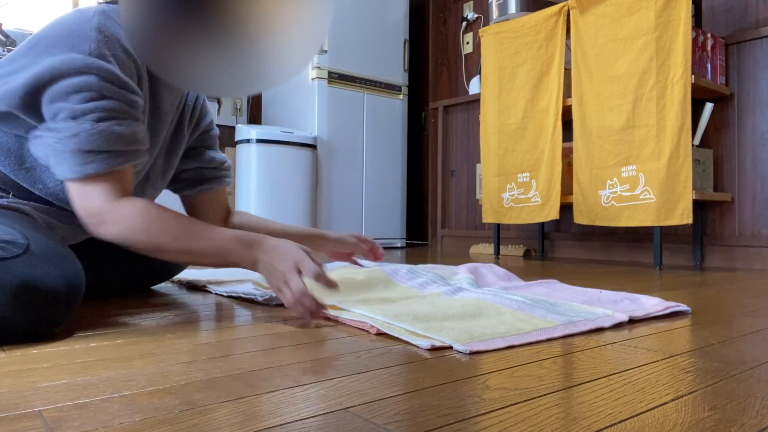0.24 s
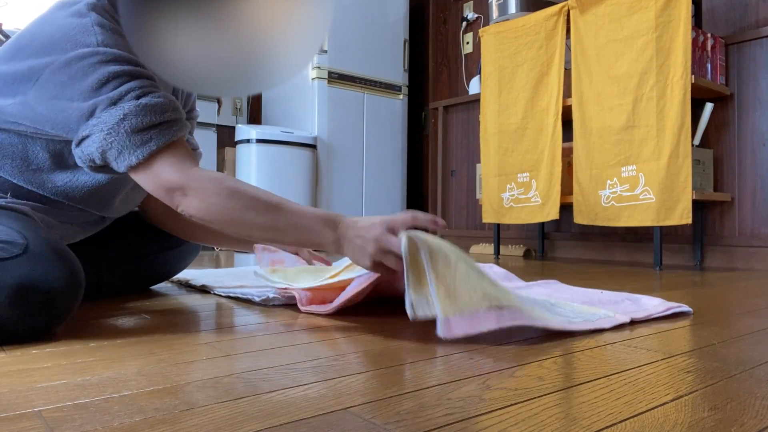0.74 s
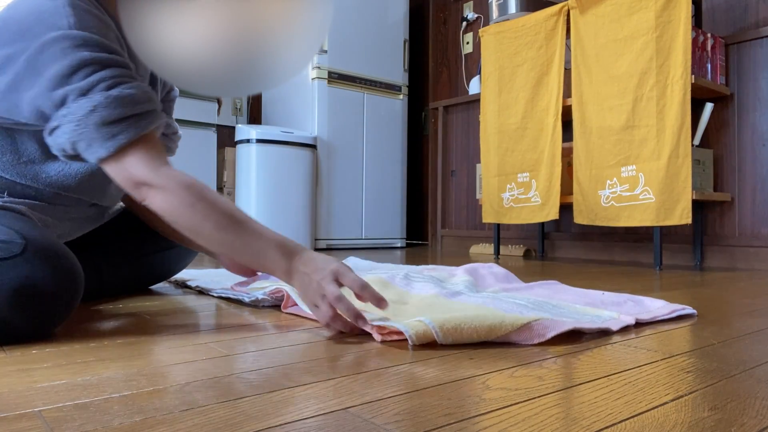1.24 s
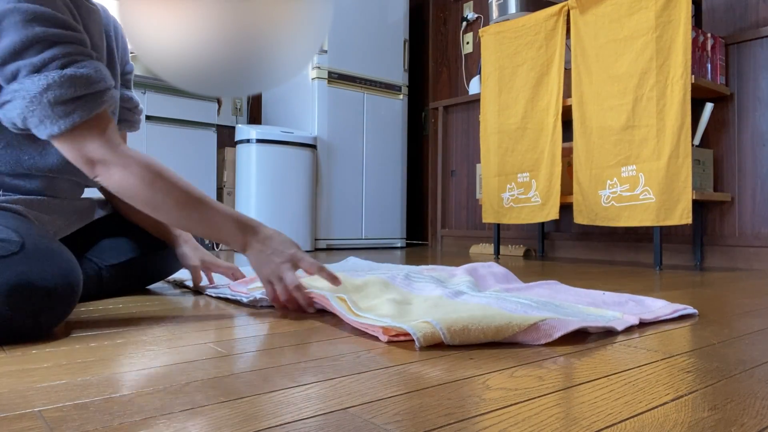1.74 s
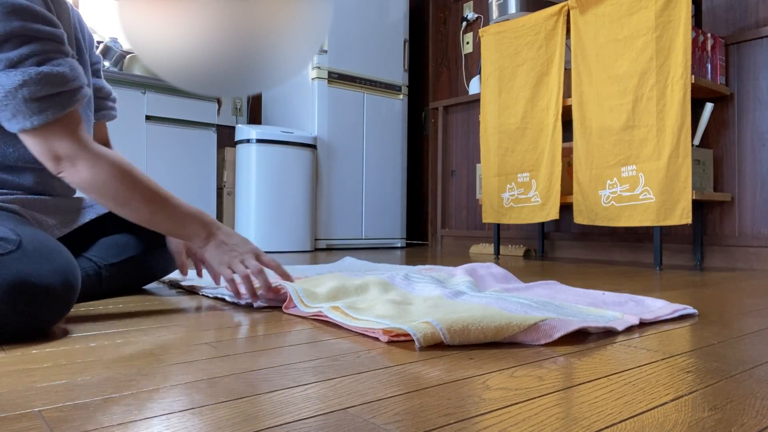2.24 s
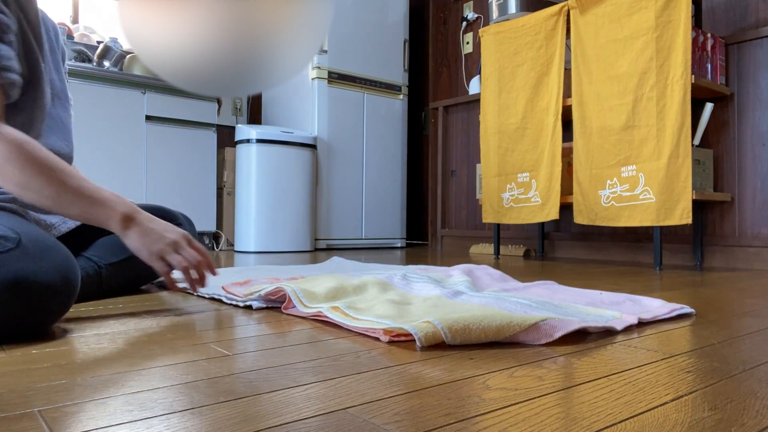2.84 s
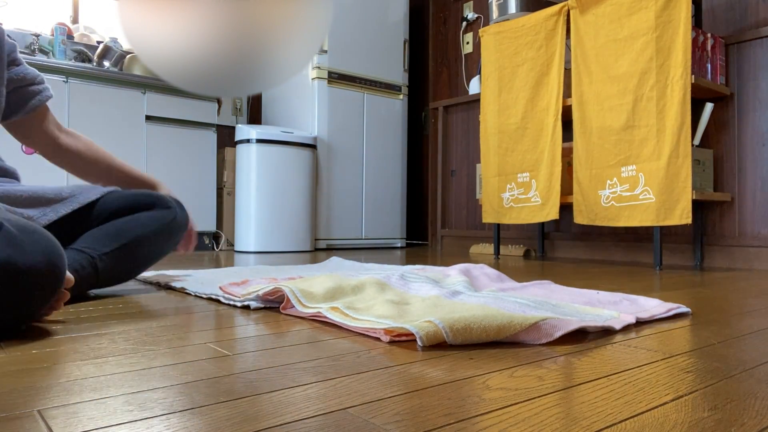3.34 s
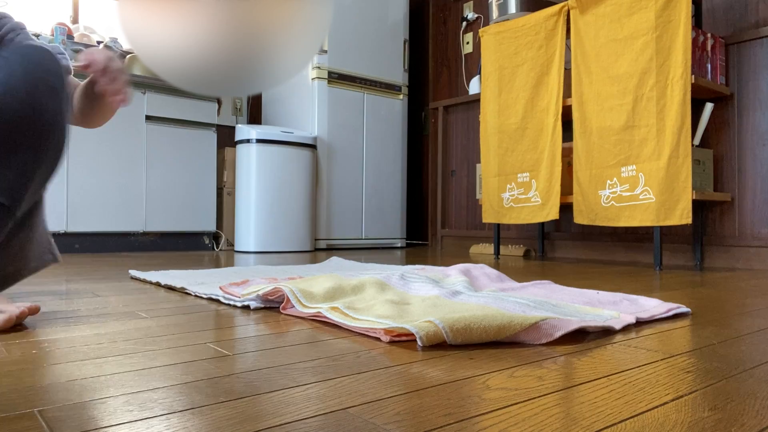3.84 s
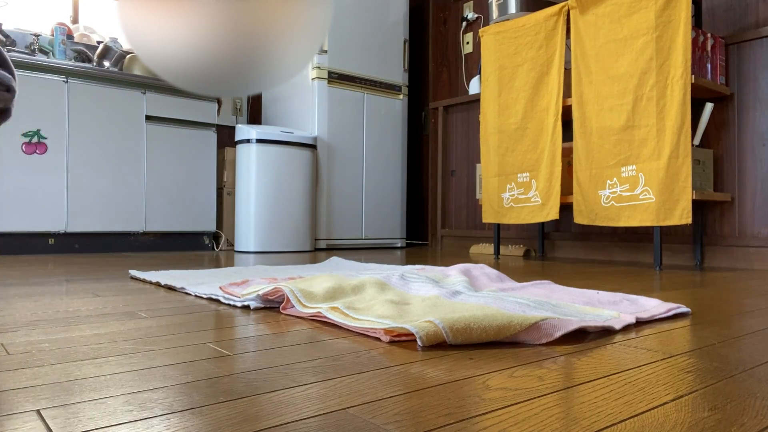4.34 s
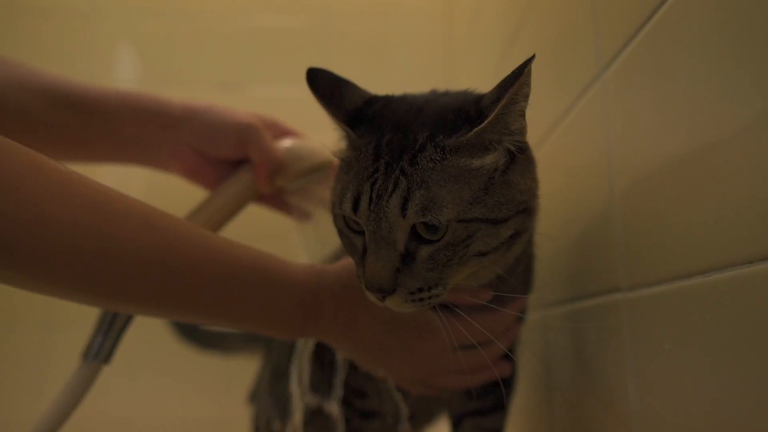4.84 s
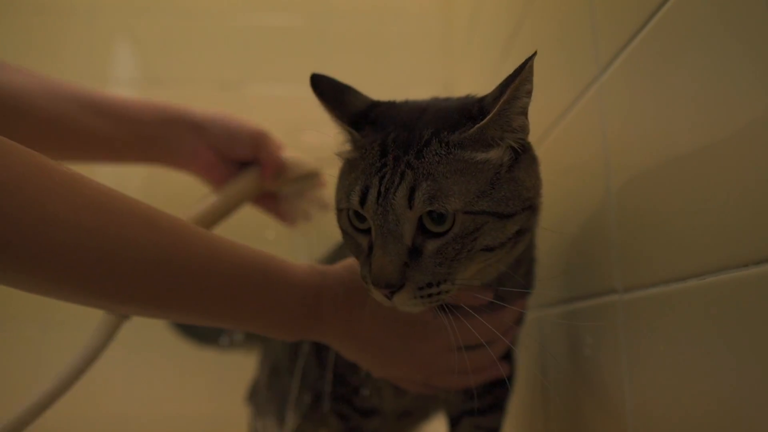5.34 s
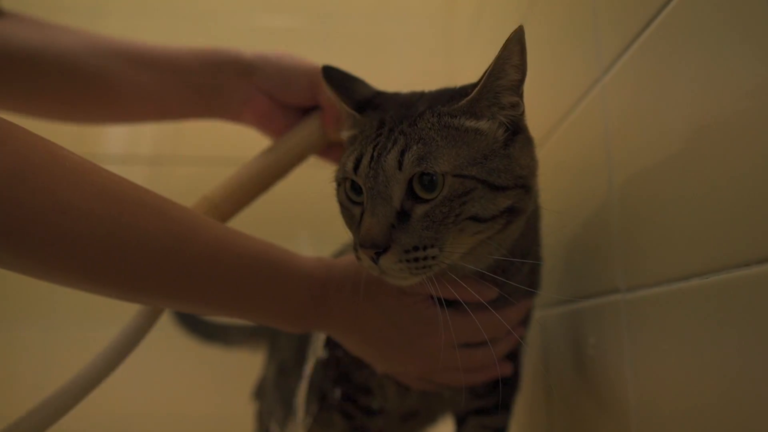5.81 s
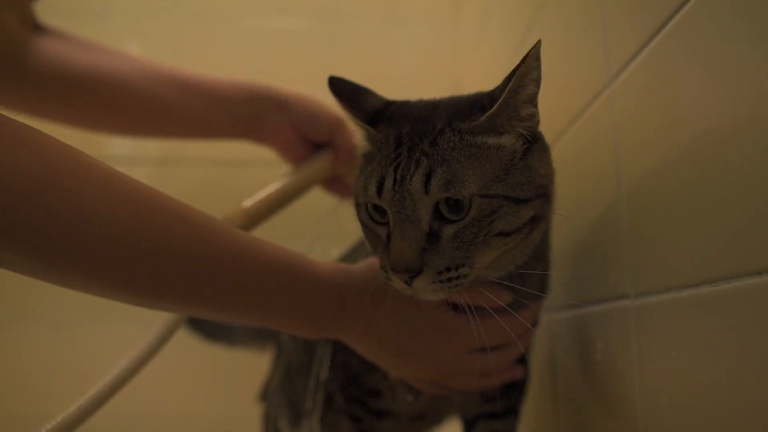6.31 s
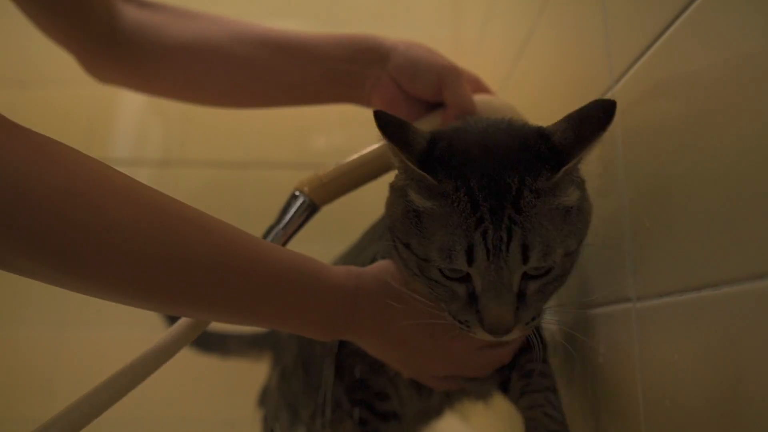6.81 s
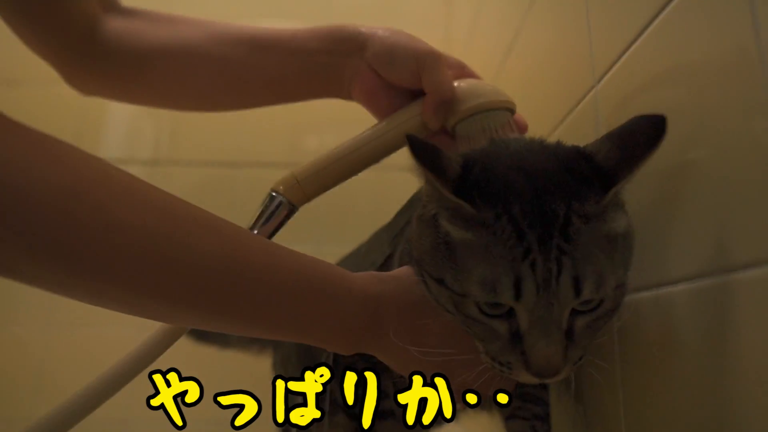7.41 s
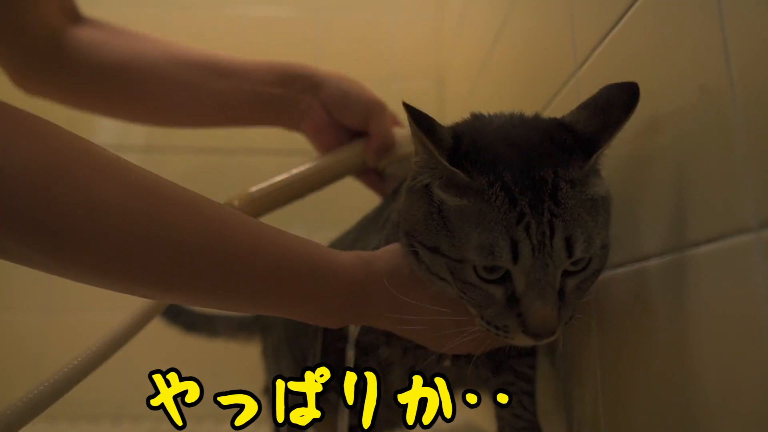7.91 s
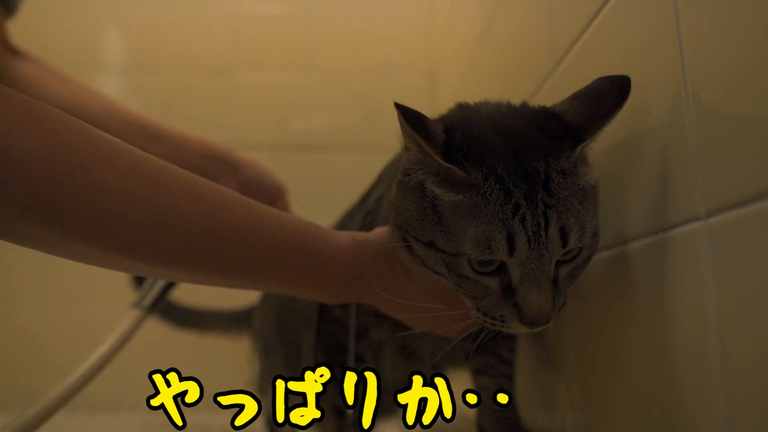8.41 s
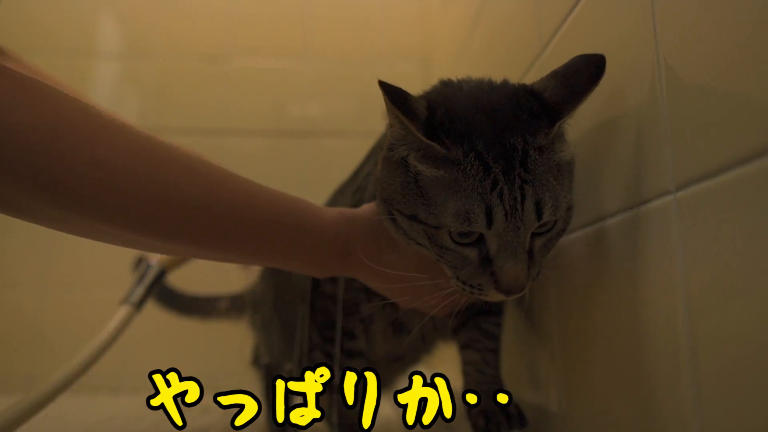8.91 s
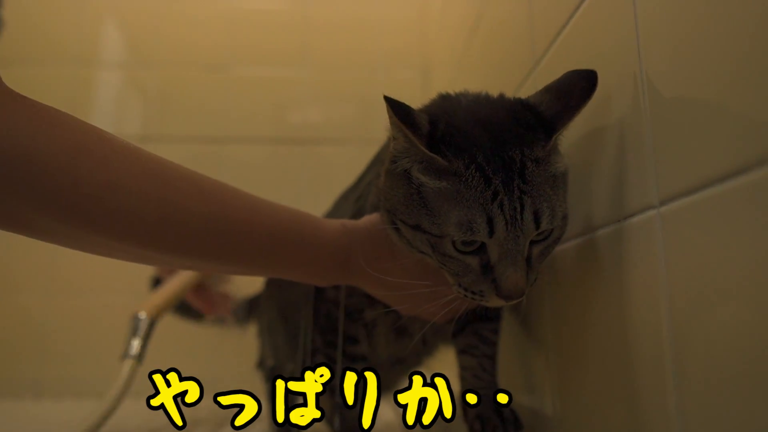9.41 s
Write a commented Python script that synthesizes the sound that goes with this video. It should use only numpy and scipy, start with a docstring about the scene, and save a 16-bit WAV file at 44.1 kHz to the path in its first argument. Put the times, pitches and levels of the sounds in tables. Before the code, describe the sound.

Sparse, low floor thuds, small taps and soft terry-cloth sweeps come first, picked up near the floor in a bare room, a little left of centre. A cluster of heavier thumps follows as someone gets up. Abruptly, continuous water takes over, mono and close: fizzing spray whose pitch shifts as the shower head moves, splattering run-off, sharp drips and ticks on tiles, and a dull tray rumble.

```python
"""A cloth swish and a first thump over a low hum: towels are being spread on a wooden kitchen floor.
Hands and knees set floor modes ringing; shaped noise makes the cloth, a little left of the stereo centre.
Then, all at once, a small tiled bathroom, heard from straight ahead: a hand shower over a cat's wet fur.
Noise and tiny rings make its hiss, which changes pitch as the head moves; run-off patters, plops and
drums on the hollow shower tray."""
import sys
import numpy as np
from scipy import signal
from scipy.fft import rfft, irfft, next_fast_len
from scipy.io import wavfile
from scipy.ndimage import map_coordinates

SR = 44100
rng = np.random.default_rng(int(sys.argv[2]) if len(sys.argv) > 2 else 0)


def wav_out(sig):
    """Save sig, one row per channel (or a flat mono array), as 16-bit PCM at SR to the path in sys.argv[1]."""
    wavfile.write(sys.argv[1], SR, np.round(np.clip(np.atleast_2d(sig).T, -1, 1) * 32767).astype(np.int16))


N = 426006
TIME = np.arange(N) / SR


def amp(db):
    """Decibels to linear gain."""
    return np.exp(np.asarray(db) * (np.log(10) / 20))


def unit(x):
    """x at rms 1."""
    return x / np.sqrt(np.mean(x ** 2) + 1e-20)


def crest(x):
    """x at peak 1."""
    return x / np.abs(x).max()


def curves(rows, t=TIME):
    """Each column after the time, read at the times t."""
    s, *cols = np.transpose(rows)
    return [np.interp(t, s, c) for c in cols]


def add(track, s, sound):
    """Mix a sound in at s seconds."""
    start = round(s * SR)
    track[start:start + len(sound)] += sound[:N - start]


def wobble(rate):
    """A smooth random curve, rate knots a second."""
    t = TIME[::64]
    knots = rng.standard_normal(int(N * rate / SR) + 4)
    return np.interp(TIME, t, map_coordinates(knots, [t * rate]))


def held(start, end, edge_s, t=TIME):
    """Rise, hold and fall, from 0 to 1 and back; each edge takes edge_s."""
    return np.clip(np.minimum(t - start, end - t) / edge_s + .5, 0, 1)


def spells(rows, edge_s):
    """The gain of a sound that comes and goes in (start, end, dB) spells."""
    t = TIME[::64]
    gain = sum(amp(db) * held(start, end, edge_s, t) for start, end, db in rows)
    return np.interp(TIME, t, gain)


def filtered(x, response):
    """x times a response of frequency."""
    n = x.shape[-1]
    m = next_fast_len(n + 8192, real=True)
    gain = np.float32(response(np.fft.rfftfreq(m, 1 / SR)))
    return irfft(rfft(np.float32(x), m) * gain, m)[..., :n]


def coloured(x, points):
    """x through a (Hz, dB) spectrum, at rms 1."""
    f, db = np.transpose(points)
    return unit(filtered(x, lambda hz: amp(np.interp(np.log(hz + 1), np.log(f), db))))


def hiss():
    """White noise."""
    return rng.standard_normal(N, dtype=np.float32)


def grains(rate, low_hz, high_hz, cycles, spread_db, size=400):
    """Countless tiny damped rings of random time, pitch and size, rate a second, at rms 1."""
    draws = rng.random((int(rate * N / SR), 4), dtype=np.float32)
    when, pitch, chance, life = draws.T[:, :, None]
    turns = low_hz * (high_hz / low_hz) ** pitch * np.arange(size, dtype=np.float32) / SR
    strength = amp(-spread_db * np.log(np.maximum(chance, .004))).astype(np.float32)
    rings = strength * np.sin(2 * np.pi * turns) * np.exp(-turns / (cycles * (.5 + life)))
    places = (when * N).astype(int) + np.arange(size)
    return unit(np.bincount(places.ravel(), rings.ravel(), minlength=N)[:N])


def tail(t60):
    """The walls' answer to a click: dense, dying, of unit energy."""
    t = np.arange(SR // 3) / SR
    answer = rng.standard_normal(len(t)) * amp(-60 * t / t60) * (1 - np.exp(-t / 0.0006))
    return answer / np.linalg.norm(answer)


def echo(x, t60):
    """The walls' answer to x; it keeps changing as the source moves about."""
    answer, block = np.zeros(N), SR // 5
    for start in range(0, N, block):
        piece, walls = x[start:start + block], tail(t60)
        if piece.any():
            add(answer, start / SR, signal.fftconvolve(np.float32(piece), np.float32(walls)))
    return answer


def ring(modes, cycles, cutoff_hz, scatter_db):
    """One blow on (Hz, dB, t60) modes: each builds up over a few cycles; soft contact spares the high ones."""
    t = np.arange(SR // 3) / SR
    hz, db, t60 = np.transpose(modes)[:, :, None]
    contact = 1 / np.hypot(1, (hz / cutoff_hz) ** 3)
    strength = amp(db + scatter_db * rng.standard_normal(hz.shape) - 60 * t / t60) * contact
    detune = 1 + 0.032 * rng.standard_normal(hz.shape)
    sway = np.sin(2 * np.pi * (hz * t * detune + 0.49 * rng.random(hz.shape)))
    # low modes build up later, so the sound falls in pitch
    build_up = 1 - np.exp(-(t * hz / cycles) ** 2)
    return crest((strength * sway * build_up).sum(0))


def snap(hz, t60, rough, glide):
    """A short ring that glides in pitch, roughened by a burst of noise around it."""
    t = np.arange(SR // 8) / SR
    band = signal.butter(3, [hz * .55, min(hz * 1.6, SR * .45)], "band", fs=SR)
    burst = unit(signal.lfilter(*band, rng.standard_normal(len(t))))
    pitch = hz * (1 + glide * (np.minimum(t / t60, 1) - .2))
    tone = np.sin(2 * np.pi * np.cumsum(pitch) / SR)
    return crest((tone + rough * burst) * amp(-60 * t / t60) * (1 - np.exp(-t * hz)))


def pat(cutoff_hz, t60):
    """Air squeezed out between two flat surfaces: a puff without pitch, duller the softer they are."""
    t = np.arange(SR // 16) / SR
    puff = rng.standard_normal(len(t)) * amp(-60 * t / t60)
    puff[0] += 3  # the first touch
    band = signal.butter(4, [220, cutoff_hz], "band", fs=SR, output="sos")
    return crest(signal.sosfilt(band, puff))


def stroke(loops, s, length, spectrum, tilt_db, sharpness=0.97):
    """One pass of the hand: the cloth sounds as it speeds up and fades as it slows."""
    piece = loops[round(s * SR):round((s + length) * SR)]
    speed = np.abs(np.sin(np.linspace(0, np.pi, len(piece))))
    tilted = [(hz, db + tilt_db * np.log2(hz)) for hz, db in spectrum]
    return speed ** sharpness * coloured(piece, tilted)


def sliding(x, passes, octaves, edge_s, upper_skirt=1.56):
    """In each pass a broad peak (a dip if its height is negative) slides from first pitch to last."""
    hz, t, z = signal.stft(x, SR, nperseg=512)
    for start, end, height_db, first_hz, last_hz in passes:
        swell = held(start, end, edge_s, t)
        on = swell > 0
        centre = np.interp(t[on], [start, end], [first_hz, last_hz])
        above = np.log2((hz[:, None] + 1) / centre)
        width = np.where(above < 0, octaves, upper_skirt * octaves)
        z[:, on] *= amp(height_db * swell[on] * np.exp(-(above / width) ** 2))
    return signal.istft(z, SR, nperseg=512)[1][:N]


def patchy(x, depth_db, per_s, per_octave):
    """The jets keep meeting other tufts and puddles, so each band swells and fades on its own."""
    hz, t, z = signal.stft(x, SR, nperseg=256)
    at = np.meshgrid(np.log2(1 + hz / 500) * per_octave, t * per_s, indexing="ij")
    knots = rng.standard_normal([int(a.max()) + 2 for a in at])
    patches = unit(map_coordinates(knots, at, order=1))
    return unit(signal.istft(z * amp(depth_db * patches), SR, nperseg=256)[1][:N])


def tiled(x, wet_db):
    """Close tiles throw the water's sound back and give it a hollow colour."""
    near = signal.oaconvolve(x, tail(t60=0.026))[:N]
    return x + amp(wet_db) * (0.62 * near + 1.26 * echo(x, t60=0.53))


# Spectrum of the kitchen's low hum: (frequency [Hz], relative level [dB per Hz])
KITCHEN_AIR = [(20, -26), (60, 1), (110, -6.5), (220, -21.5), (400, -28), (800, -37.5), (2000, -44),
               (6000, -50), (15000, -55.5)]


def kitchen_hum():
    """The room behind everything: a hum common to both channels plus one of each channel's own."""
    shared = coloured(hiss(), KITCHEN_AIR)
    return shared + 0.89 * np.array([coloured(hiss(), KITCHEN_AIR) for ear in range(2)])


# Weight shifting on the floor: (start [s], end [s], relative level [dB])
SHUFFLE = [(.6, 1.03, -47.5), (1.8, 2.25, -52.5), (2.97, 3.15, -47.5), (3.15, 3.6, -56.5),
           (3.62, 4.05, -45), (4.1, 4.52, -49)]
# Spectrum of that rumble: (frequency [Hz], relative level [dB per Hz])
SHIFTING = [(20, -27), (42, -7), (63, 8), (100, -1), (170, -6), (300, -23), (500, -32.5), (900, -75)]


def shuffling():
    """Weight shifting over the boards: low noise in spells."""
    return spells(SHUFFLE, edge_s=0.091) * amp(2.5) * coloured(hiss(), SHIFTING)


# Hands, knees and feet on the boards:
# (time [s], relative thump level [dB], relative knock level [dB], contact cut-off [Hz])
BLOWS = [(0.252, -29, -31, 415), (0.578, -16, -27, 287), (0.845, -37, -35, 900), (.874, -19.5, -30.5, 560),
         (1.141, -34, -43.5, 690), (1.307, -43, -35.5, 470), (1.387, -39.5, -39.5, 476),
         (1.558, -36, -32.5, 397), (1.789, -44, -42.5, 500), (1.862, -48, -34.5, 440),
         (2.066, -37, -40, 410), (2.522, -32, -34, 487), (2.569, -36, -38.5, 330), (2.971, -32.5, -41, 170),
         (3.387, -32, -34.5, 258), (3.587, -33.5, -32, 450), (3.623, -26, -34, 253), (3.742, -28, -22, 280),
         (3.778, -23.5, -27, 198), (3.865, -31.5, -46, 180)]
# Modes of the sprung floor as a whole: (nominal frequency [Hz], relative level [dB], t60 [s])
JOISTS = [(60, -15.5, .45), (83.5, -14.5, .4), (97, 8, .1), (107, -20, .5), (127, -7, .09)]
# Modes of its single boards: (nominal frequency [Hz], relative level [dB], t60 [s])
BOARDS = [(148.6, 0, 0.37), (178, 2.5, 0.21), (207.4, 3, .15), (238, -3.5, 0.23), (287.5, 3, 0.17),
          (326, 1, 0.2), (383.4, 0, 0.11), (440.7, -4.5, 0.23), (507, -3, 0.15), (582, -10.5, 0.15),
          (800, -11, 0.089)]
# The body's weight lands and the whole floor sags: (time [s], relative peak level [dB])
SAGS = [(2.555, -46), (2.981, -31), (3.635, -31), (3.786, -22)]
# Fingers slapping, boards ticking: (time [s], relative peak level [dB], nominal pitch [Hz], t60 [s])
TICKS = [(0.248, -48, 1900, 0.02), (.357, -51, 600, 0.06), (.654, -48, 2400, .012), (.866, -49, 2400, .012),
         (0.877, -37, 440, 0.085), (.876, -36, 3800, 0.006), (1.559, -48, 2840, 0.02),
         (1.785, -50, 2600, 0.022), (2.062, -51.5, 2260, .015), (2.5222, -37.5, 3400, .011),
         (2.524, -48, 700, 0.06)]
# Towel and palm landing flat: (time [s], relative peak level [dB], cut-off [Hz], t60 [s])
PATS = [(.846, -30.5, 1020, .013), (.858, -44, 1000, .025), (.876, -37, 9000, .005),
        (1.146, -45, 850, .025), (2.522, -37, 6000, .006), (2.523, -35, 480, .025), (3.62, -38, 1600, .02)]
# A loose board clacks as the weight comes off it: (time [s], relative peak level [dB])
CLACKS = [(3.347, -37.5), (3.385, -39.5)]
# Modes of the loose board: (nominal frequency [Hz], relative level [dB], t60 [s])
LOOSE_BOARD = [(800, -4, .025), (950, -2, .03), (1090, 0, .03), (1270, -4, .025), (1450, -1, .03),
               (1620, 0, .035), (2600, -10, .015)]


def floorboards():
    """Each blow knocks a board at once; the whole floor swings up more slowly, and sags under real weight."""
    wood = np.zeros(N)
    floor_lag_s = 0.0035  # the floor swings a moment after the contact
    for s, thump_db, knock_db, cutoff_hz in BLOWS:
        thump = ring(JOISTS, cycles=1.1, cutoff_hz=cutoff_hz, scatter_db=3.5)
        knock = ring(BOARDS, cycles=0.74, cutoff_hz=cutoff_hz, scatter_db=1.0)
        add(wood, s + floor_lag_s, amp(thump_db - 1.5) * thump)
        add(wood, s, amp(knock_db) * knock)
    for s, db in SAGS:
        add(wood, s, amp(db) * snap(hz=59.0, t60=0.11, rough=0.11, glide=-.2))
    for s, db, hz, t60 in TICKS:
        add(wood, s, amp(db) * snap(hz, t60, rough=0.9, glide=-0.4))
    for s, db, cutoff_hz, t60 in PATS:
        add(wood, s, amp(db) * pat(cutoff_hz, t60))
    for s, db in CLACKS:
        add(wood, s, amp(db) * ring(LOOSE_BOARD, cycles=.5, cutoff_hz=3000, scatter_db=2))
    return wood


# Palms rubbing over the towel: (start [s], length [s], relative level [dB], tilt [dB per octave])
RUBS = [(0.244, 0.015, -58, -2), (0.264, 0.053, -58, 1), (0.349, 0.014, -65, -9), (1.272, 0.074, -61, -2),
        (1.375, 0.052, -59, 1), (1.763, .03, -64, 12), (1.836, 0.042, -62, -5), (3.477, 0.088, -61, 11),
        (3.697, 0.069, -62.5, 0), (3.984, 0.073, -61.5, -4), (4.348, 0.047, -48.5, 8)]
# Spectrum of skin scratching on terry: (frequency [Hz], relative level [dB per Hz])
PALM = [(700, -22), (1900, -9), (2550, 2), (2900, -4), (3450, 3.5), (4300, -5), (5400, -6), (6400, 0),
        (8000, -9), (13000, -11), (16000, -23)]


def palms():
    """A palm scratches over the pile, swelling and fading, snagging loop after loop."""
    scratch = hiss() + grains(rate=1300, low_hz=2000, high_hz=8000, cycles=2, spread_db=1.6, size=64)
    snag_db, snags_per_s = 3, 330  # depth and rate at which the loops catch
    scratch = scratch * amp(snag_db * wobble(snags_per_s))
    rubs = np.zeros(N)
    for s, length, db, tilt_db in RUBS:
        add(rubs, s, amp(db) * stroke(scratch, s, length, PALM, tilt_db, sharpness=0.67))
    return amp(1.5) * rubs


# Faint, restless rustle of handled towels: (start [s], end [s], relative level [dB])
HANDLING = [(.25, 2.15, -71.5), (2.52, 3.77, -75.5), (3.33, 4.52, -66.5)]
# Single sweeps of towel or sleeve: (start [s], length [s], relative level [dB], tilt [dB per octave])
SWISHES = [(0.217, 0.19, -53.5, -4), (0.532, 0.044, -66, 1), (0.69, 0.088, -67, 4.5),
           (0.824, 0.036, -68, 9), (0.926, 0.12, -72, 6), (1.244, 0.11, -68, 13), (1.797, 0.1, -64.5, 0.5),
           (2.06, 0.082, -68.5, 7), (2.481, 0.11, -57.5, -3.5), (2.597, 0.069, -73, 5),
           (3.031, 0.1, -63.5, 8), (3.382, 0.22, -57.5, 0), (3.627, 0.12, -61, -1), (3.762, 0.22, -58.5, 1),
           (3.96, 0.072, -69, 3), (4.286, 0.12, -54.5, 0.5)]
# Spectrum of the terry cloth: (frequency [Hz], relative level [dB per Hz])
TERRY = [(150, 8), (330, 15.5), (700, 0), (1100, -.5), (1900, -4.5), (3500, -1.5), (6800, -2),
         (10000, -7.5), (13300, -8), (15500, -19)]
# Towel sliding on the boards: (start [s], end [s], relative level [dB])
DRAG = [(.26, 1.04, -69), (1.78, 1.88, -67)]
# Spectrum of that slide: (frequency [Hz], relative level [dB per Hz])
SLIDE = [(400, 5), (900, -21), (1400, 3.5), (1950, 8), (2600, 0), (5000, -21), (12000, -39)]


def towels():
    """Terry loops catch and slip, and the towel drags on the boards."""
    catches = grains(rate=1100, low_hz=1500, high_hz=12000, cycles=1.3, spread_db=2.6, size=64)
    loops = hiss() + .6 * catches
    restless = amp(1.6 * wobble(9))
    swish = spells(HANDLING, edge_s=0.078) * restless * coloured(loops, TERRY)
    for s, length, db, tilt_db in SWISHES:
        # read backwards, so the sweeps do not repeat the rustle's noise
        add(swish, s, amp(db) * stroke(loops[::-1], s, length, TERRY, tilt_db))
    drag = spells(DRAG, edge_s=.05) * coloured(hiss(), SLIDE)
    return amp(5.0 + 3.0 * wobble(44)) * swish + drag


# The person moves off to the left: (time [s], lag of the right channel [s])
RIGHT_LAG = [(0, 0), (2.5, .00005), (3.2, .00019), (4.3, .00032)]


def kitchen():
    """Floor and towels a little to the left, with much of the bare room in the sound, over a low hum."""
    boards = floorboards() + shuffling()
    cloth, rubs = towels(), palms()
    # the kitchen walls give back little of the boards below 133 Hz
    thin_boards = signal.lfilter(*signal.butter(2, 133, "high", fs=SR), boards)
    reflected = amp(-6.5) * thin_boards + amp(1.0) * cloth + amp(-5) * rubs
    walls = np.array([echo(reflected, t60=0.26) for ear in range(2)])
    direct = amp(-0.4) * boards + amp(-7.5) * cloth + rubs
    lag, = curves(RIGHT_LAG)
    pair = np.array([direct, map_coordinates(direct, [(TIME - lag) * SR])])
    leftwards = amp([[.7], [-.9]])  # left and right channel
    return (pair + walls) * leftwards + amp(-56.0) * kitchen_hum()


# The lowered head aims straight at the tray: (start [s], end [s], level [dB])
JETS = [(8.6, 8.73, -39), (9.03, 9.28, -38.5), (9.28, 9.5, -40.5), (9.5, 9.66, -41.5)]
# Spectrum of the thrumming tray: (frequency [Hz], relative level [dB per Hz])
THRUM = [(60, -72), (95, 1), (125, -16.5), (150, 0.5), (185, -40), (215, -7), (260, -23.5), (400, -25),
         (800, -42)]


def jets():
    """Jets that miss the fur set the hollow tray thrumming."""
    return spells(JETS, edge_s=0.044) * coloured(hiss(), THRUM)


# Streams falling on the tray: (time [s], relative level [dB])
DRUMMING = [(4.53, -42.5), (4.7, -39), (5.1, -40), (5.6, -44.5), (5.85, -44), (6.45, -39.5), (6.9, -45),
            (7.75, -46.5), (8.5, -44.5), (9.1, -40.5), (9.66, -37.5)]
# Spectrum of the drummed tray: (frequency [Hz], relative level [dB per Hz])
TRAY = [(40, -21), (62, 1.5), (90, 4), (130, -0.5), (170, -12.5), (215, -1), (255, -7.5), (296, -10.5),
        (400, -10), (800, -41)]
# Water running into the pool: (time [s], relative level [dB])
RUNOFF_LEVEL = [(4.53, -42.5), (5.12, -41.5), (5.4, -45), (5.7, -40.5), (5.95, -40.5), (6.1, -43.5),
                (6.4, -42.5), (6.7, -44), (7.5, -44), (8.1, -41), (8.55, -42), (8.7, -44.5), (8.9, -41.5),
                (9.2, -46), (9.66, -44)]
# Spectrum of the splattering water: (frequency [Hz], relative level [dB per Hz])
RUNOFF = [(120, -22), (270, 3.5), (400, -1), (520, -1.5), (680, 1), (950, -0.5), (1450, -0.5), (2200, -7.5),
          (5000, -12)]
# Water gushes off the coat and the pool rings: (start [s], end [s], peak height [dB], pitch [Hz])
GUSHES = [(4.57, 4.728, 13, 252), (4.93, 5.123, 5, 370), (5.693, 5.928, 3.5, 610), (6.335, 6.503, 6.5, 430),
          (6.86, 7.028, 6.5, 1400), (6.98, 7.29, 5, 980), (7.307, 7.736, 5, 1350), (7.738, 7.95, 7, 755),
          (7.98, 8.207, 4, 760), (8.214, 8.42, 2.5, 610), (8.805, 8.904, 9, 706), (8.917, 9.044, 6, 890)]


def runoff():
    """Streams fall from the coat, splatter and bubble in a pool, and drum on the tray, which booms low."""
    drum_db, = curves(DRUMMING)
    pool_db, = curves(RUNOFF_LEVEL)
    patter = grains(rate=300, low_hz=395, high_hz=2155, cycles=2.0, spread_db=-0.5, size=300)
    splatter = hiss() + 0.35 * patter
    bubbles = grains(rate=70, low_hz=800, high_hz=3000, cycles=4, spread_db=1.8, size=800)
    water = coloured(tiled(splatter, wet_db=-4.5), RUNOFF) + amp(-16.5) * bubbles
    gushes = [(start, end, db, hz, hz) for start, end, db, hz in GUSHES]  # the pitch stays put
    pool = sliding(water, gushes, octaves=0.65, edge_s=0.075)
    drum = amp(drum_db + 1.15 * wobble(18)) * coloured(hiss(), TRAY)
    # the tray's lowest mode follows the drumming at half its swing in dB
    boom = coloured(hiss(), [(12, -17.5), (24, -5.5), (33, -3.0), (43, -8.5), (55, -22), (300, -93)])
    boom_gain = amp(-34.5 + 0.5 * (drum_db - drum_db.mean()))
    return amp(pool_db + 0.34 * wobble(25)) * pool + drum + boom_gain * boom


# Big drops: (time [s], peak level [dB] of the bubble, nominal pitch [Hz], t60 [s])
PLOPS = [(4.556, -25, 4500, .005), (4.594, -26, 2300, 0.0072), (4.621, -27, 3000, .012),
         (4.657, -20, 8300, 0.0059), (4.664, -22, 3300, .008), (4.693, -22, 5000, 0.0062),
         (4.743, -24, 5660, .005), (4.766, -24.5, 3230, 0.02), (4.878, -22, 1820, 0.017),
         (4.896, -28, 1710, .016), (4.961, -21, 3300, .007), (5.041, -18.5, 3280, 0.009),
         (5.09, -30, 850, .03), (5.104, -19, 8800, 0.012), (5.296, -28, 2620, 0.0056),
         (5.424, -24, 3300, 0.012), (5.471, -22.5, 5840, .009), (5.56, -25, 9700, .013),
         (5.712, -28.5, 2560, 0.012), (5.811, -29, 3000, 0.012), (5.831, -20.5, 5570, .0077),
         (5.872, -21.5, 3950, 0.023), (5.897, -14.5, 8100, 0.005), (5.948, -22, 3870, .006),
         (6.041, -24, 3900, .009), (6.071, -21, 2500, .014), (6.139, -23, 5600, 0.013),
         (6.179, -28.5, 2740, 0.013), (6.237, -27, 2450, 0.015), (6.32, -30, 2200, .007),
         (6.514, -29, 3600, .008), (6.535, -28, 9200, 0.0053), (6.76, -28, 5900, .015),
         (6.799, -29, 1780, .016), (6.828, -27, 5600, .008), (6.846, -28, 1800, .013),
         (6.879, -17.5, 1570, 0.013), (6.922, -27, 1750, .015), (6.948, -28, 2500, .01),
         (6.956, -19, 1580, 0.022), (6.96, -27, 3350, 0.022), (7.696, -15.5, 2240, 0.006),
         (7.9, -28, 850, .035), (7.902, -22, 2760, .008), (7.916, -19, 6070, 0.0064),
         (8.616, -26, 4230, .007), (8.735, -25, 4090, 0.008), (9.118, -23, 7100, 0.0083),
         (9.196, -26, 3900, .009), (9.296, -26, 3750, .01), (9.356, -32, 1530, .02),
         (9.415, -31, 1020, .04), (9.501, -19.5, 4100, 0.014), (9.585, -28, 2200, .014)]


def plops():
    """Big drops tick, trap a bubble of rising pitch and throw a few droplets; the tiles ring after them."""
    drops = np.zeros(N)
    splat_db, satellite_db = -9, -14  # impact and thrown droplets, against the bubble
    scatter_s = .028  # longest flight of a droplet
    for s, db, hz, t60 in PLOPS:
        add(drops, s, amp(db) * snap(hz, t60, rough=.005 / t60, glide=.2))
        add(drops, s, amp(db + splat_db) * snap(1.5 * hz, t60=.003, rough=3, glide=0))
        for flight, octaves in rng.random((3, 2)):
            droplet = snap(hz * 2 ** (octaves - .5), t60=.008, rough=1, glide=.2)
            add(drops, s + scatter_s * flight, amp(db + satellite_db) * droplet)
    return drops + amp(-9) * echo(drops, t60=.24)


# Sheets of water break on the tiles in a cluster of ticks: (start [s], end [s], level [dB])
SPLASHES = [(4.655, 4.69, -44), (4.945, 4.975, -34.5), (5.034, 5.05, -44), (5.07, 5.088, -46),
            (5.892, 5.91, -47), (5.945, 5.975, -42), (7.897, 7.93, -37.5), (8.745, 8.76, -42),
            (9.11, 9.17, -52)]
# Jets slip past the cat and spatter on the tiles, here and in spray():
# (start [s], end [s], relative level [dB])
SPATTER = [(4.6, 5.15, -43.5), (5.77, 6.24, -44.5), (8.68, 8.77, -44), (9.08, 9.45, -44.5)]


def splashes():
    """Crowds of sharp ticks wherever water meets the bare tiles."""
    ticks = grains(rate=170, low_hz=2900, high_hz=13000, cycles=2, spread_db=2, size=110)
    cluster = grains(rate=2200, low_hz=1700, high_hz=13000, cycles=1.2, spread_db=1.5, size=80)
    crowd = amp(-1.5) * spells(SPATTER, edge_s=.06) * ticks
    return crowd + spells(SPLASHES, edge_s=0.012) * cluster


# The spray wanders over the coat: (time [s], relative hiss level [dB])
SPRAY = [(4.53, -43.5), (5.05, -39), (5.25, -46), (5.6, -44), (6.15, -43.5), (6.43, -50), (6.65, -43),
         (7.1, -43.5), (7.4, -38.5), (8.15, -39.5), (8.8, -43.5), (9.0, -42.5), (9.15, -39), (9.66, -39)]
# Spectrum of jets fizzing in fur: (frequency [Hz], relative level [dB per Hz])
FUR = [(700, -2.5), (1500, -5), (2200, -2.5), (3200, -2), (4600, 1), (5500, 4.5), (7000, -1.5),
       (10000, -14), (16000, -9)]
# Spectrum of the mist: (frequency [Hz], relative level [dB per Hz])
MIST = [(2500, -24), (4800, -10), (5600, -7.5), (7000, 4), (8500, 4.5), (10300, 0), (12500, 2), (14500, -2),
        (16000, -27)]
# The head comes close to the fur and the gap rings:
# (start [s], end [s], peak height [dB], first pitch [Hz], last pitch [Hz])
CLOSE_PASSES = [(5.87, 6.09, 7, 3770, 2880), (6.7, 6.79, 6.5, 5600, 6040), (7.29, 7.504, 7.5, 3150, 2650),
                (7.504, 7.715, 9.5, 2550, 2150), (7.89, 8.098, 8, 2900, 3300), (8.1, 8.45, 8, 3450, 3550),
                (8.47, 8.56, 6, 4900, 5300), (8.627, 8.772, 3, 3420, 3300), (8.89, 9.07, 10, 4000, 3550)]


def spray():
    """Fine jets fizz in the fur, with a mist that follows them; stray jets crackle and drip on the tiles."""
    fur_db, = curves(SPRAY)
    fizz = hiss() + .5 * grains(rate=1400, low_hz=1700, high_hz=7000, cycles=3, spread_db=2.8, size=110)
    crackles = grains(rate=1400, low_hz=5000, high_hz=13900, cycles=2.3, spread_db=3.0, size=64)
    crackle = hiss() + 1.85 * crackles
    droplets = grains(rate=110, low_hz=2600, high_hz=6500, cycles=3.5, spread_db=2.8, size=260)
    flutter, spatter = wobble(45), spells(SPATTER, edge_s=0.025)
    coat = coloured(tiled(fizz, wet_db=-6.0), FUR)
    coat = patchy(coat, depth_db=1.8, per_s=28, per_octave=4)
    fur = sliding(coat, CLOSE_PASSES, octaves=0.4, edge_s=0.05, upper_skirt=2.1)
    mist = amp(0.51 * flutter) * coloured(tiled(crackle, wet_db=-7), MIST)
    fur_gain = np.hypot(amp(fur_db + 0.53 * flutter), amp(-12.0) * spatter)
    # the mist moves 0.68 dB per dB of hiss
    mist_db = -45.5 + 0.68 * (fur_db - fur_db.mean())
    mist_gain = np.hypot(amp(mist_db), spatter)
    return fur_gain * fur + mist_gain * mist + amp(-52) * droplets


# The hiss turns hollow as the head swings away:
# (start [s], end [s], height [dB], negative for a dip, first pitch [Hz], last pitch [Hz])
HOLLOWS = [(6.518, 6.817, -2, 2500, 2800), (8.58, 8.774, -2, 1700, 1500), (9.01, 9.222, -2, 1700, 1660)]


def bathroom():
    """All the water, heard from straight ahead: the same in both channels."""
    water = sliding(spray() + runoff(), HOLLOWS, octaves=0.63, edge_s=.05)
    return water + jets() + plops() + splashes()


def scene():
    """The kitchen gives way abruptly to the bathroom."""
    cut_s = 4.521
    return np.where(TIME < cut_s, kitchen(), bathroom())


def record(dry):
    """The microphone's band limit: nothing is kept from 15900 Hz up."""
    return filtered(dry, lambda hz: hz < 15900)


dry = scene()
out = record(dry)
wav_out(out)
```